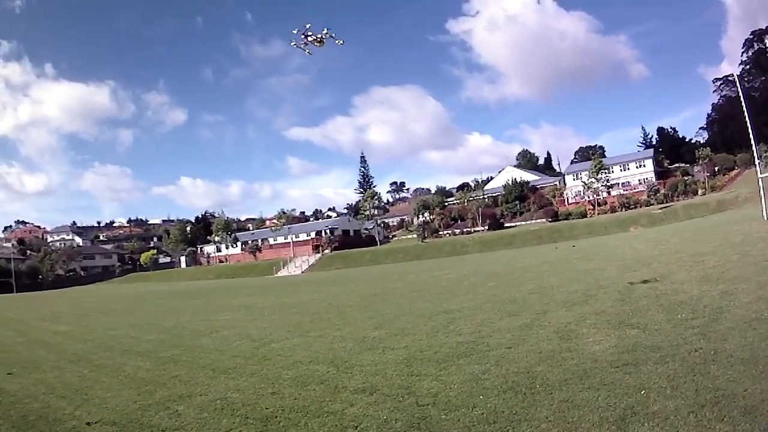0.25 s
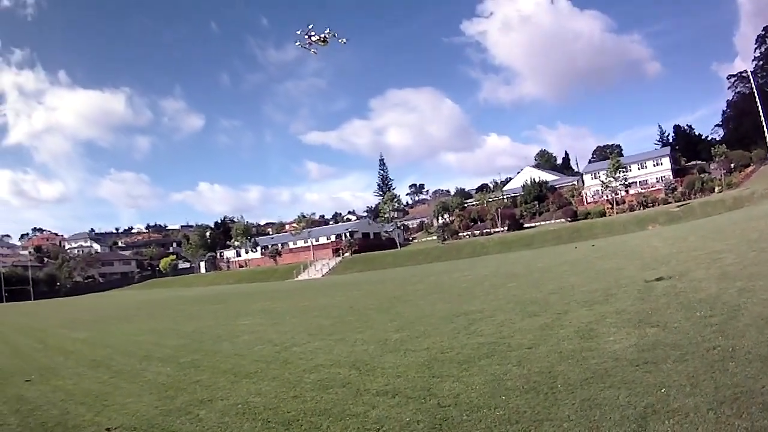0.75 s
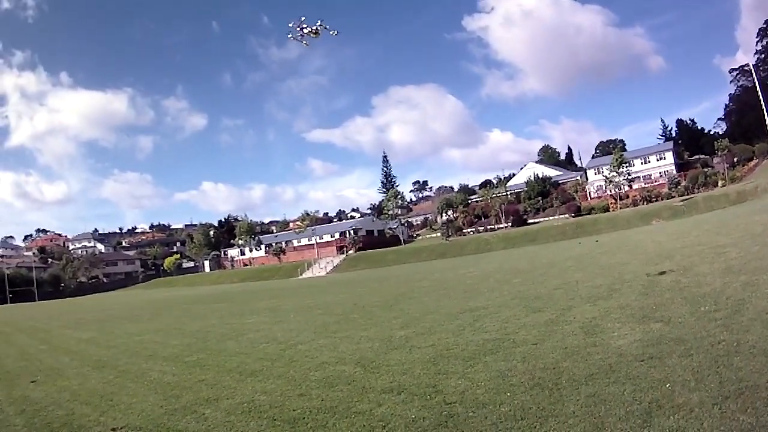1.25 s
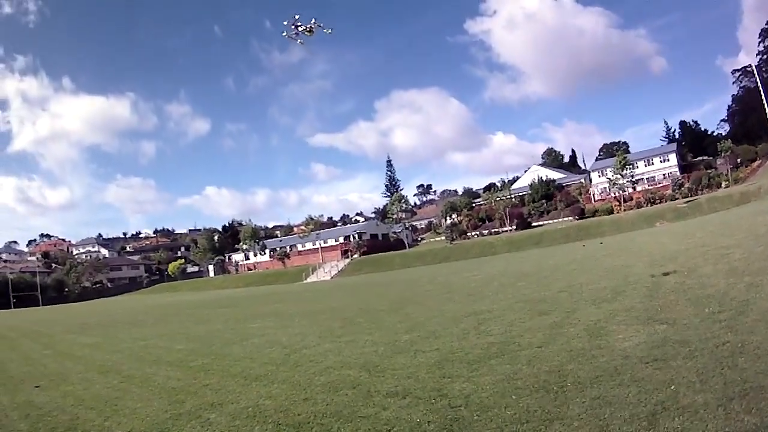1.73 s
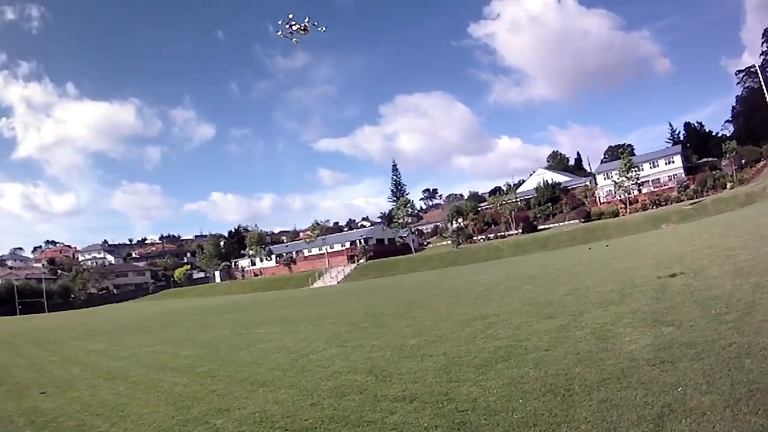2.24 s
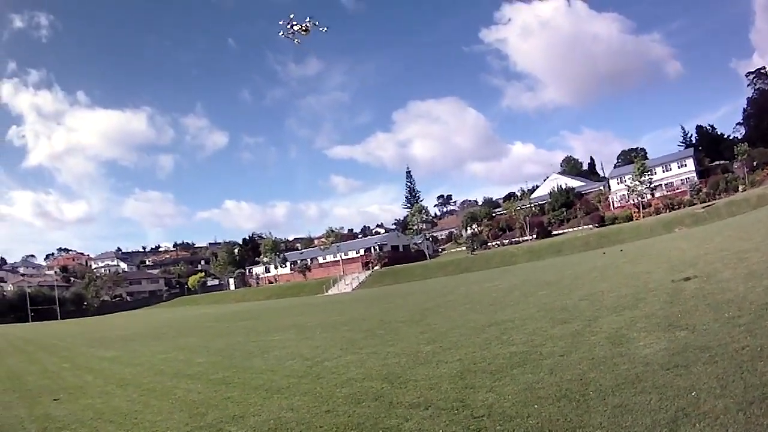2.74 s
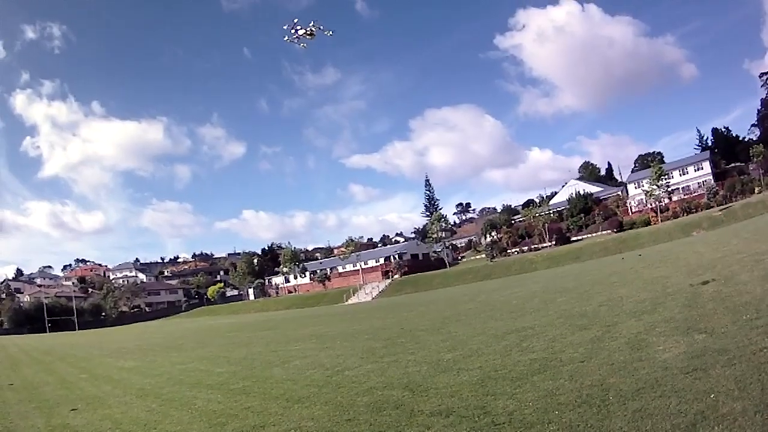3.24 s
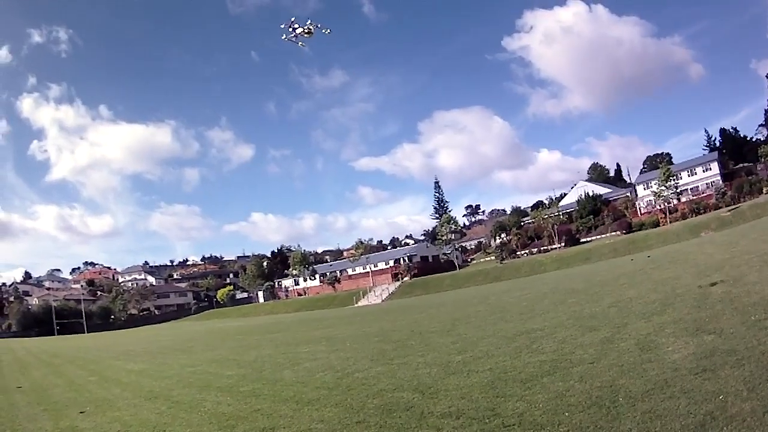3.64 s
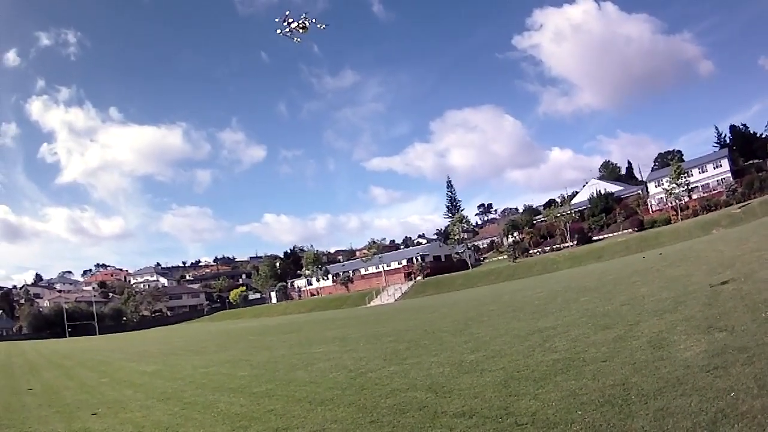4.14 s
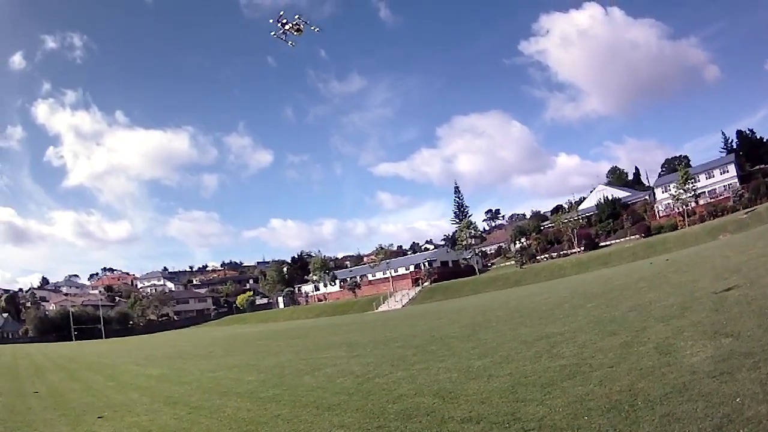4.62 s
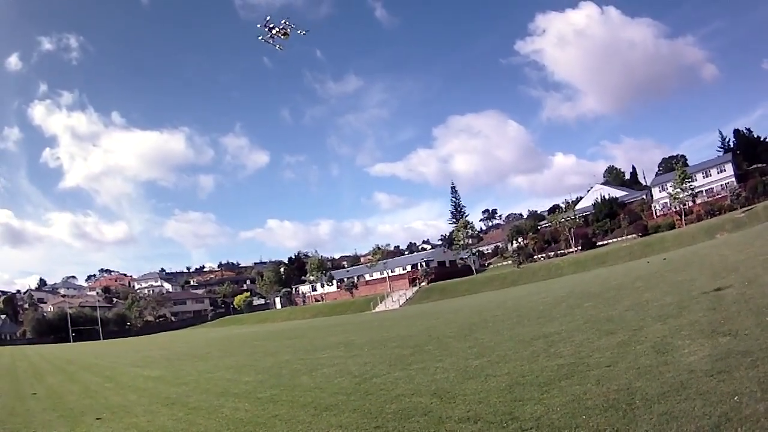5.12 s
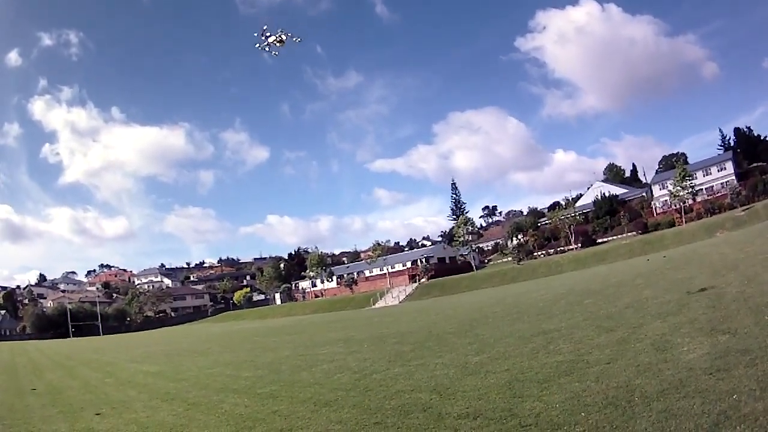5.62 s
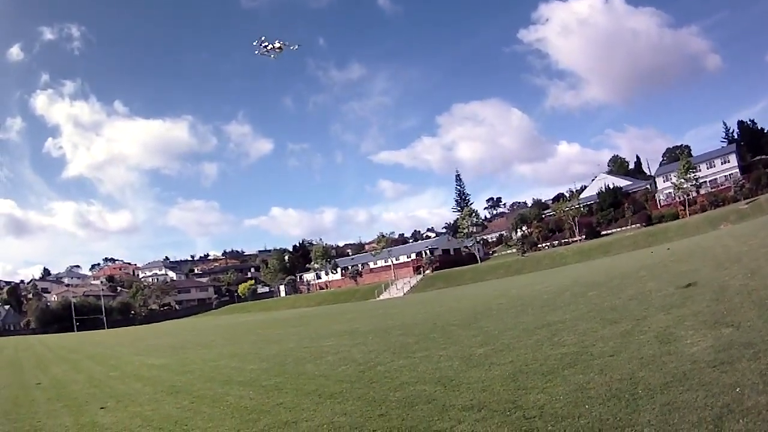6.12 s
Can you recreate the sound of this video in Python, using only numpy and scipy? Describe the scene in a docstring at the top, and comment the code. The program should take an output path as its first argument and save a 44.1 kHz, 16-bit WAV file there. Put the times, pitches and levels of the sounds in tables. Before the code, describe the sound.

Steady hovering drone from start to finish, its pitch trembling slightly around a low buzz, with bright whine and blade-chopped rush above. It sits strongly to the right. On the left are a dull, fainter copy, soft hiss, puffs of low rumble and a few abrupt muffled thumps. Small outdoor microphone, open grass, dry sound, slightly limited treble.

```python
"""A six-rotor drone hovers high over an open playing field, heard mostly in the right channel.
Its rotors run at slightly different speeds, so their harmonic series beat and waver.
Noise pulsing with the blades makes the rush, and narrow noise resonances make the motor whine.
The left channel has hiss, fitful rumble and a bias that shifts and sags, giving dull fluttering thumps.
Faint outdoor noise, partly shared by the two sides, lies behind everything."""
import sys
import numpy as np
from scipy import signal
from scipy.fft import rfft, irfft, next_fast_len
from scipy.io import wavfile
from scipy.ndimage import uniform_filter1d

SR = 44100
rng = np.random.default_rng(int(sys.argv[2]) if len(sys.argv) > 2 else 0)


def unload_wav(signal):
    """Save mono or channel-first audio to the path in sys.argv[1] as 16-bit WAV at rate SR, clipped to [-1, 1]."""
    wavfile.write(
        sys.argv[1],
        SR,
        np.round(np.clip(np.atleast_2d(signal).T, -1, 1) * 32767).astype(np.int16),
    )


N = 280917
TIME = np.arange(N) / SR


def from_db(db):
    """Amplitude ratio: 20 dB is a factor of ten."""
    return 10 ** (np.asarray(db) / 20)


def in_time(rows):
    """Linear interpolation: each column of a curve at every sample."""
    times_s, *columns = np.transpose(rows)
    return [np.interp(TIME, times_s, column) for column in columns]


def drift(rate_hz):
    """Low-passed chance: a random curve of spread 1, changing about rate_hz times a second."""
    stride = 40  # samples between computed points
    pole = np.exp(-2 * np.pi * rate_hz * stride / SR)
    white = rng.standard_normal(N // stride + 2002)
    slow = signal.lfilter([1], [1, -2 * pole, pole * pole], white)[2000:]  # drop the filter's settling
    return np.interp(np.arange(N) / stride, np.arange(len(slow)), slow / slow.std())


def noise(gain_at):
    """Spectral shaping: noise whose amplitude per root hertz follows a function of frequency."""
    size = next_fast_len(N, True)
    hz = np.maximum(np.arange(size // 2 + 1) * SR / size, 1)
    spectrum = rfft(rng.standard_normal(size)) * gain_at(hz)
    return irfft(spectrum, size)[:N] * np.sqrt(SR / 2)


def coloured(spectrum):
    """Broadband noise: density is interpolated in dB over log frequency."""
    points_hz, db = np.transpose(spectrum)
    return noise(lambda hz: from_db(np.interp(np.log(hz), np.log(points_hz), db)))


def resonant(centre_hz, width_hz, level_db):
    """Resonance: noise in one bell-shaped band, 3 dB down half a width from its centre."""
    return from_db(level_db) * noise(lambda hz: 2 ** (-2 * ((hz - centre_hz) / width_hz) ** 2))


def step(at_s, length_s):
    """Smooth transition: a rise from 0 to 1."""
    return .5 + .5 * np.tanh(2 * (TIME - at_s) / length_s)


def bump(at_s, length_s):
    """Gaussian envelope: a swell of height 1, down to 1/e at length_s either side."""
    return np.exp(-((TIME - at_s) / length_s) ** 2)


# common rotor speed: time_s, blade_rate_hz (blade passes per second)
COMMON_SPEED = [(0, 216), (.5, 213), (1.0, 210.5), (1.3, 212.5), (2.2, 212.6), (2.8, 209.7), (4.7, 209.5),
                (5.3, 210.6), (5.8, 206), (6.37, 212)]
# rotors: mean_speed_offset_percent, odd_harmonics_db, even_harmonics_db (relative levels)
ROTORS = [(0.06, 0, -5), (-0.77, -4, 0), (0.78, -2.5, -3), (-2, -6, -1.5), (2.5, -8, -3), (-5, -8, -14)]


def rotor_phases(hunt=.0035, tremble=0.0025):
    """Phase is integrated blade rate; the flight controller keeps trimming each rotor's speed."""
    speed_hz, = in_time(COMMON_SPEED)
    phases = []
    for offset_percent, _, _ in ROTORS:
        ratio = 1 + offset_percent / 100 + hunt * drift(1.2) + tremble * drift(13.73)
        phases.append(2 * np.pi * (np.cumsum(speed_hz * ratio) / SR + rng.random()))
    return phases


# which multiples of the blade rate sound: harmonic order
ORDERS_HEARD = (1, 2, 3, 4, 5, 6, 7, 8, 9, 10, 11, 14, 15, 16, 18, 22)
# first seven harmonics, mean level: before_db, after_db, turn_s
LOW_HARMONICS = [(-65.5, -73, 2.3), (-66, -62, 3.2), (-57.5, -61, 2.9), (-63, -67, 4.8), (-72, -71, 3.0),
                 (-64.5, -66, 3.0), (-57, -61, 4.1)]
# each higher harmonic, before the loudness curve: level_db
HIGH_HARMONICS_DB = [-66, -69.5, -69, -67, -63.5, -58, -64, -61, -60]
TURN_TAKES_S = .9


def blade_tones(phases, rush_db, waver_db=1.83, waver_hz=4.6):
    """Beating of harmonic series: a turn of the craft tips low orders, gusty inflow wavers every order."""
    levels_db = [before_db + (after_db - before_db) * step(turn_s, TURN_TAKES_S)
                 for before_db, after_db, turn_s in LOW_HARMONICS]
    levels_db += [level_db + rush_db for level_db in HIGH_HARMONICS_DB]
    _, odd_db, even_db = np.transpose(ROTORS)
    out = np.zeros(N)
    for order, level_db in zip(ORDERS_HEARD, levels_db):
        shares = from_db(odd_db if order % 2 else even_db)
        lines = sum(share * np.sin(order * phase + 2 * np.pi * rng.random())
                    for share, phase in zip(shares, phases))
        unit_lines = np.sqrt(2) * lines / np.linalg.norm(shares)  # total RMS of 1
        out += unit_lines * from_db(level_db + waver_db * drift(waver_hz))
    return out


# turbulent air off the blades, mean spectrum: frequency_hz, level_db_per_hz
RUSH = [(40, -92), (150, -91.5), (400, -86.5), (900, -87.5), (1380, -79.5), (1850, -85.5), (2250, -84),
        (2700, -86.5), (4250, -86), (5100, -92), (6000, -98.5), (7800, -89), (11500, -102), (15000, -99.5)]


def blade_rush(phases, rush_db, chop=0.11, gust_db=.5):
    """Amplitude modulation: turbulence off the blades pulses with each pass."""
    passes = 1 + chop * sum(np.cos(phase) for phase in phases)
    return coloured(RUSH) * passes * from_db(rush_db + gust_db * drift(8.8))


# resonances of motors and blades, mean level, lowest first: centre_hz, width_hz, level_db_per_hz
WHINE = [(3202, 355, -77.5), (3666, 430, -82), (4638, 400, -84.5), (5520, 500, -89.5), (6440, 400, -90.5),
         (7340, 270, -86.5), (8300, 235, -87.5), (8800, 380, -85), (10510, 240, -94), (13500, 300, -102),
         (15200, 340, -91.5)]
# brief flares of the lowest resonance: peak_s, lift_db
FLARES = [(1.516, 4), (1.635, 9.5), (1.713, 6), (4.459, 5)]
FLARE_S = 0.0096


def motor_whine(phases, whine_db, flicker_db=1.0, shared_db=.5, chop=0.02):
    """Resonance: narrow bands flicker and throb with the blades; the lowest one flares at times."""
    main, *upper = [resonant(centre_hz, width_hz, level_db) * from_db(flicker_db * drift(15))
                    for centre_hz, width_hz, level_db in WHINE]
    flare_db = sum(lift_db * bump(peak_s, FLARE_S) for peak_s, lift_db in FLARES)
    throb = 1 + chop * sum(np.cos(phase) for phase in phases)
    bands = main * from_db(flare_db) + sum(upper)
    return bands * throb * from_db(whine_db + shared_db * drift(28))


# faint tick, knock then bright edge: peak_s, length_s, centre_hz, width_hz, peak_db_per_hz
TICKS = [(4.278, 0.0033, 2700, 700, -69), (4.279, .004, 11000, 7000, -93)]


def tick():
    """Transient: short bursts of band noise form a knock with a bright edge."""
    return sum(bump(peak_s, length_s) * resonant(centre_hz, width_hz, level_db)
               for peak_s, length_s, centre_hz, width_hz, level_db in TICKS)


def low_rumble(centre_hz=180, width_hz=200):
    """Band-limiting: dull noise at 0 dB per hertz in its middle, with steep sides."""
    return noise(lambda hz: 1 / np.sqrt(1 + ((hz - centre_hz) / (width_hz / 2)) ** 10))


# bias thumps, before gating and low-pass (depth, swell and overshoot in full scale):
# sag_s, return_s, depth, swell, overshoot, flutter_hz (mean), flutter_db
THUMPS = [(.534, 0.581, 0.047, 0.0037, 0.021, 130, -38), (1.409, 1.472, 0.024, 0.027, 0.044, 139.4, -34.5),
          (2.326, 2.35, 0.028, 0.033, 0.0026, 127.5, -34.5),
          (5.334, 5.359, 0.033, 0.033, -0.0064, 128, -35.5)]
# soft shifts of the bias: middle_s, step (full scale)
SHIFTS = [(1.263, -0.03), (3.735, 0.031), (4.592, -0.024)]
LEFT_BIAS = .4545  # full scale


def left_thumps(edge_s=0.001, swell_s=0.013, overshoot_s=0.0045, flutter_s=0.01, rattle_s=0.018,
                wander=0.125, before_db=-66, after_db=-65, top_hz=400):
    """Bias transients: the level swells roughly, sags abruptly, holds, and flutters as it comes back."""
    out = sum(size * step(middle_s, 0.0087) for middle_s, size in SHIFTS)
    uneven_time = np.cumsum(1 + wander * drift(89.5)) / SR
    rough = low_rumble(centre_hz=212, width_hz=156)
    rough = rough * rough.std() / np.sqrt(uniform_filter1d(rough ** 2, size=600))  # even out its level
    for sag_s, return_s, depth, swell, overshoot, flutter_hz, flutter_db in THUMPS:
        held = step(sag_s, edge_s) - step(return_s, edge_s)
        before = bump(sag_s - .005, swell_s) * swell
        before += bump(sag_s - .009, rattle_s) * from_db(before_db) * rough
        # these peak just ahead of the return, so the hold hides all but their tails
        flutter = from_db(flutter_db) * np.sin(2 * np.pi * flutter_hz * uneven_time)
        after = bump(return_s - 0.0032, overshoot_s) * overshoot
        after += bump(return_s - 0.011, flutter_s) * flutter
        after += bump(return_s - 0.0099, rattle_s) * from_db(after_db) * rough
        out = out + (1 - held) * (before + after) - held * depth
    dull = signal.butter(2, top_hz, fs=SR, output="sos")
    return LEFT_BIAS + signal.sosfiltfilt(dull, out)


# the clearest puffs of rumble: peak_s, peak_db_per_hz
PUFFS = [(.91, -86), (1.0, -84), (2.08, -78), (3.09, -81.5), (3.67, -81), (4.22, -82.5), (5.66, -88)]
PUFF_S = 0.024
# random fits: mean level in dB per Hz, rate in Hz, rough share of the time they sound
FITS_DB, FITS_HZ, FITS_SHARE = -89, 2.74, 0.21
# one long spell in which the rumble hardly stops
SPELL_START_S, SPELL_END_S, SPELL_SHARE = 2.65, 4.9, 0.86


def left_rumble(fade_s=.04, lumpy_db=2.5):
    """Random gating: lumpy low noise switches on and off by chance, with a few set puffs."""
    in_spell = (TIME > SPELL_START_S) & (TIME < SPELL_END_S)
    share = FITS_SHARE + (SPELL_SHARE - FITS_SHARE) * in_spell
    chance = .5 + .5 * np.tanh(drift(FITS_HZ))
    gate = uniform_filter1d(1.0 * (chance < share), int(fade_s * SR))
    fits = gate * from_db(FITS_DB + lumpy_db * drift(9.7))
    puffs = sum(from_db(level_db) * bump(peak_s, PUFF_S) for peak_s, level_db in PUFFS)
    return (fits + puffs) * low_rumble()


# hiss of the left channel: frequency_hz, level_db_per_hz
LEFT_HISS = [(250, -108), (400, -92.5), (1500, -97.5), (3000, -99), (5000, -102), (6000, -116),
             (7000, -106), (10000, -108), (12000, -115), (15000, -112)]


def left_hiss():
    """Stationary noise: a steady coloured hiss."""
    return coloured(LEFT_HISS)


# open air all round: frequency_hz, level_db_per_hz
AIR = [(220, -115), (380, -90), (600, -90), (1200, -91), (2500, -96), (4500, -100), (6000, -116),
       (15000, -120)]


def open_air(likeness=.55):
    """Partial coherence: even outdoor noise whose two sides share part of their power."""
    share = np.clip(likeness, 0, 1)
    own = np.array([coloured(AIR), coloured(AIR)])
    return np.sqrt(share) * coloured(AIR) + np.sqrt(1 - share) * own


# loudness of the craft: time_s, level_db (before the shares below)
LOUDNESS = [(0, .2), (2.0, 1.26), (2.7, .5), (4.5, .2), (5.1, -.8), (5.9, -1.2), (6.37, -.4)]
RUSH_FOLLOWS, WHINE_FOLLOWS = .7, 1.07  # shares of the loudness swing in dB


def scene(left_db=-15.0, scatter_db=-15, shadow_hz=11000, scatter_hz=4500):
    """Shadowing: the craft lies right; on the left its treble is dulled and arrives mostly scattered."""
    loud_db, = in_time(LOUDNESS)
    rush_db, whine_db = RUSH_FOLLOWS * loud_db, WHINE_FOLLOWS * loud_db
    phases = rotor_phases()
    drone = blade_tones(phases, rush_db) + blade_rush(phases, rush_db)
    drone += motor_whine(phases, whine_db) + tick()
    shadow = signal.butter(1, shadow_hz, fs=SR, output="sos")
    direct = signal.sosfiltfilt(shadow, drone)
    # scattered whine has its own noise, unlike that on the right
    treble = signal.butter(1, scatter_hz, "high", fs=SR, output="sos")
    scattered = signal.sosfilt(treble, motor_whine(phases, whine_db))
    left = from_db(left_db) * direct + from_db(scatter_db) * scattered
    left += left_thumps() + left_rumble() + left_hiss()
    return np.array([left, drone]) + open_air()


def record(dry):
    """Band-limiting: a steep elliptic low-pass cuts the top at 15400 Hz."""
    return signal.sosfiltfilt(signal.ellip(10, .05, 60, 15400, fs=SR, output="sos"), dry)


dry = scene()
out = record(dry)
unload_wav(out)
```